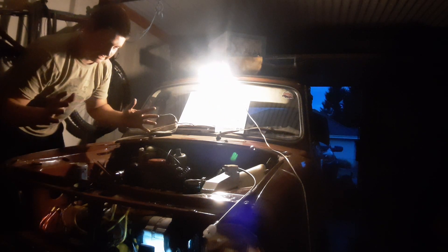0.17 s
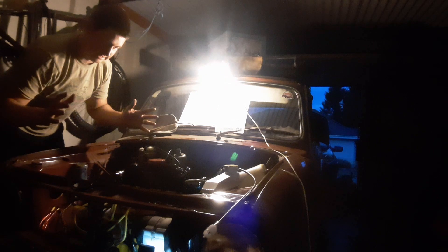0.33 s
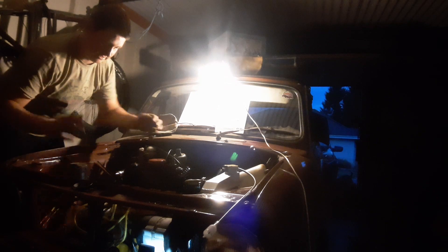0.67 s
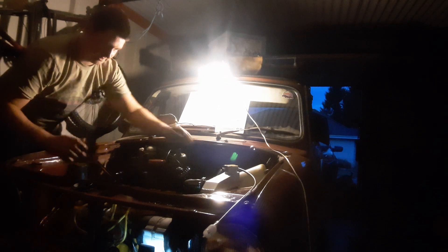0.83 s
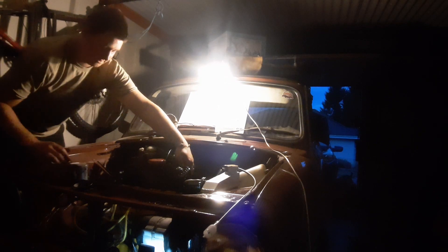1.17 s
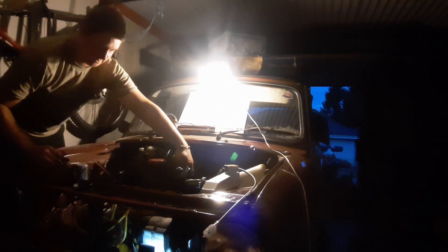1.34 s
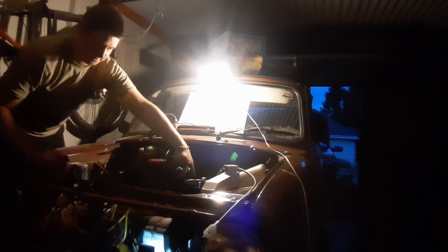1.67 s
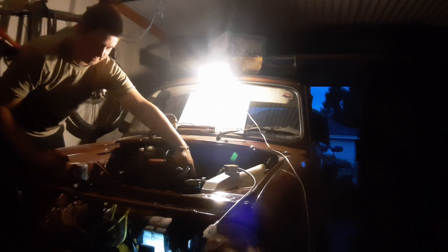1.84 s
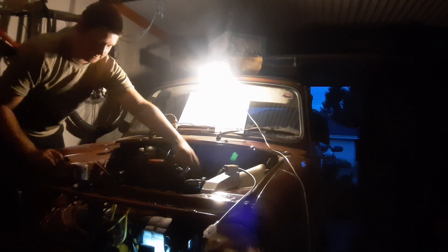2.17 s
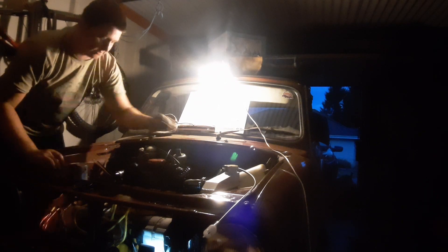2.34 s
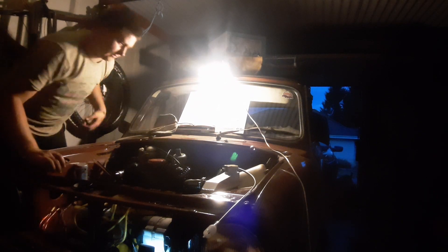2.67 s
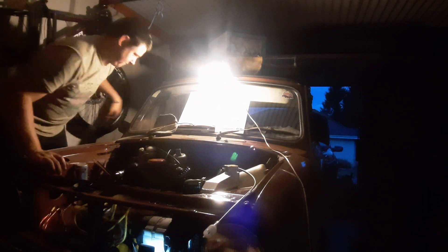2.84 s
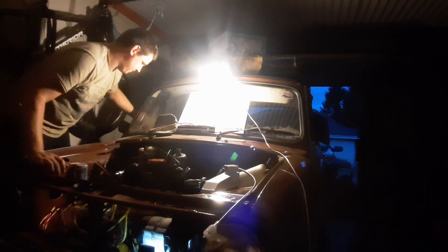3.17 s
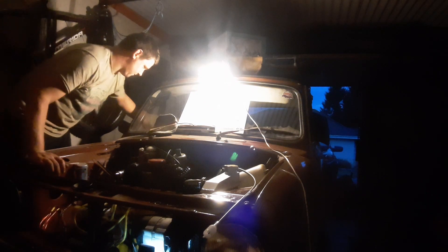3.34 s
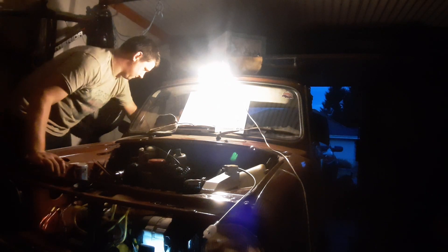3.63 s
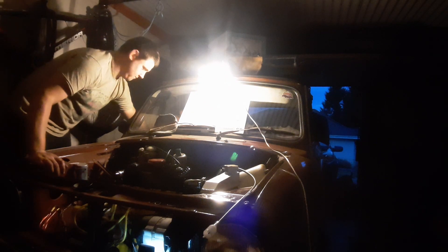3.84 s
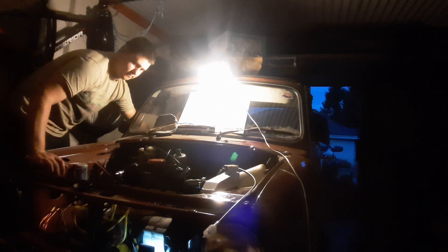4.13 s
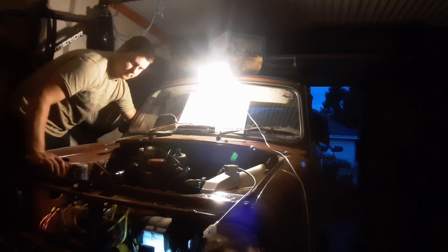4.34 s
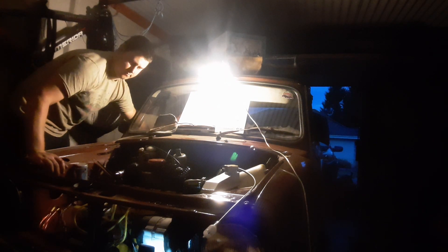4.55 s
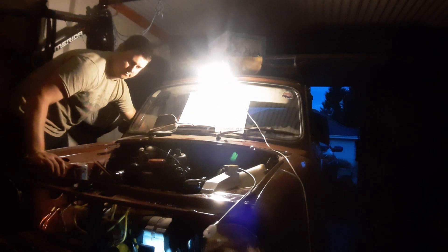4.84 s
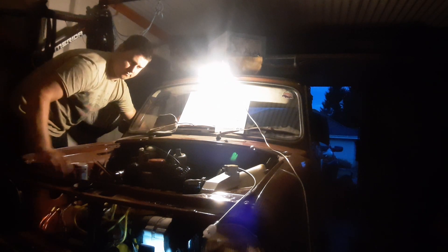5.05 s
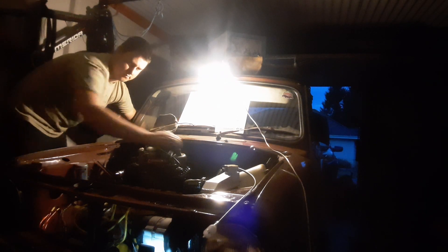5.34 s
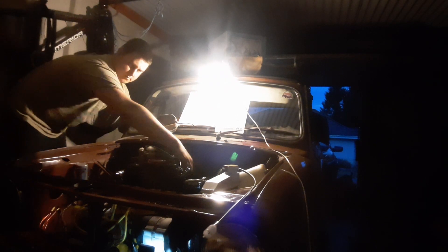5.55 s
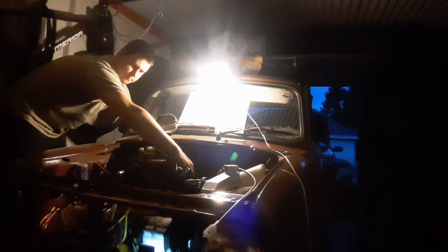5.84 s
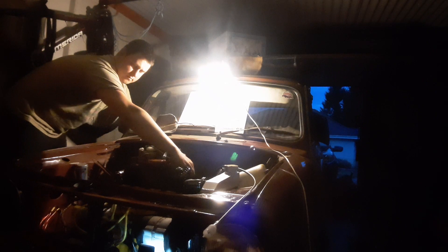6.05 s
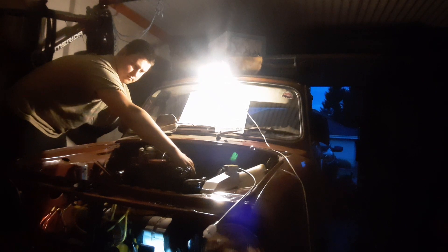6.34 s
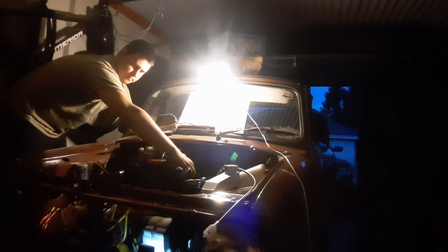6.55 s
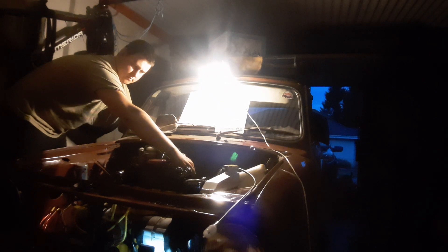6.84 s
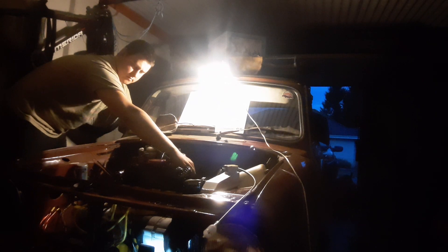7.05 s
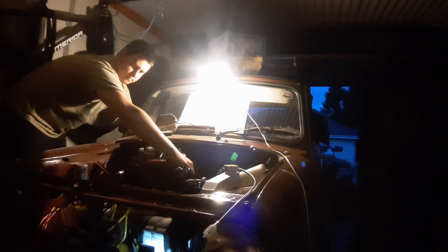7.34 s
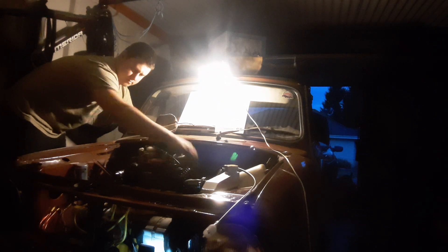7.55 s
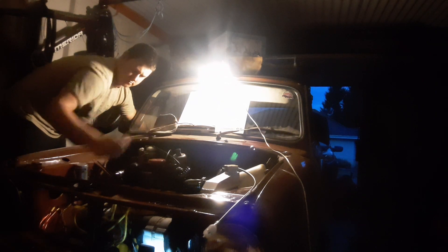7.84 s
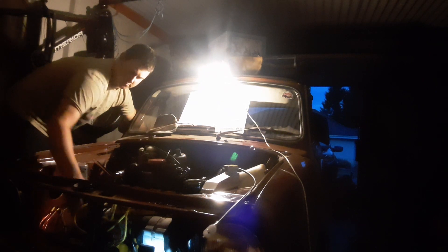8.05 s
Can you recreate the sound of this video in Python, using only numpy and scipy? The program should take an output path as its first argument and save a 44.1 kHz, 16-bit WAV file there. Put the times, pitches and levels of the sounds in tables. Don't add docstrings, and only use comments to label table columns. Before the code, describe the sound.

In a garage, a rough little engine stalls; quiet knocks and rubbing follow, then cranking, a roaring rev, a sharp carburettor cough and uneven idling.

```python
import sys
import numpy as np
from scipy import signal
from scipy.fft import rfft, irfft, next_fast_len
from scipy.io import wavfile
from scipy.ndimage import uniform_filter1d, map_coordinates

SR = 44100
rng = np.random.default_rng(int(sys.argv[2]) if len(sys.argv) > 2 else 0)


def waveform_to_disk(signal):
    frames = np.transpose(np.atleast_2d(signal))
    scaled = np.clip(frames, -1, 1) * 32767
    samples = np.round(scaled).astype(np.int16)
    wavfile.write(sys.argv[1], SR, samples)


def makeup_ratio(level_db):
    decades = np.asarray(level_db, float) / 20
    return 10 ** decades


N = 361619
T = np.arange(N) / SR
PADDED = next_fast_len(N)
HZ = np.fft.rfftfreq(PADDED, 1 / SR) + 1

# (frequency [Hz], density [dB per Hz])
ENGINE_TONE = [(110, -35), (180, -11), (328, 0), (645, -4), (722, -3.5), (1010, -6.5), (1150, -5),
               (1500, -2), (1810, -9), (2950, -1), (5000, -5), (6870, -2.5), (8290, -10.5), (12300, -10.5),
               (16000, -9.5)]
# (time [s], strokes done [count], drop of the air flow [dB])
CRANK_STROKES = [(-.14, -4, 6), (.135, 0, 8), (.417, 4, 2), (.671, 8, 7), (.943, 12, 9), (1.231, 16, 9),
                 (1.55, 20, 11), (1.811, 23, 9), (1.924, 24, 1), (2.3, 25, 1), (4.3, 26, 1), (4.659, 28, 1),
                 (4.897, 30, 1), (5.073, 33, 1), (5.282, 37, 1), (5.482, 41, 2), (5.688, 45, 1),
                 (5.904, 49, 4), (6.106, 53, 2), (6.299, 57, 3), (6.476, 61, 4), (6.684, 66, 3),
                 (6.856, 70, 2), (7.023, 74, 4), (7.249, 78, 3), (7.515, 82, 5), (7.773, 86, 3),
                 (8.003, 90, 2), (8.21, 94, 2)]
KEY_S, MESH_S, RELEASE_S = 4.382, 4.425, 5.16
SPIT_S, SPIT_AIR_DB, SPIT_BLOCK_DB, SPIT_TOP_DB = 7.104, -20.5, -26, -25


def unit(x):
    return x / np.sqrt(np.mean(x ** 2))


def gains(parts, column, fade=0.0031):
    out = np.zeros(N)
    for rows in parts:
        s, db = np.array(rows)[:, [0, column]].T
        edge = np.clip(np.minimum(T - s[0], s[-1] - T) / fade + 1, 0, 1)
        out += edge * makeup_ratio(np.interp(T, s, db))
    return out


def swell(s, attack_s, hold_s, db, sag_db_s, fall_db_s):
    t = T - s - attack_s
    rise = np.clip(1 + t / attack_s, 0, 1) ** 2
    return rise * makeup_ratio(db - sag_db_s * np.clip(t, 0, hold_s) - fall_db_s * np.maximum(t - hold_s, 0))


def on_log(rows):
    return np.interp(np.log(HZ), np.log(np.array(rows)[:, 0]), np.array(rows)[:, 1])


def ring(x, hz, width):
    return signal.lfilter(*signal.iirpeak(hz, hz / width, fs=SR), x)


def walk(rate):
    k = int(SR / rate)
    steps = np.repeat(rng.standard_normal(N // k + 1), k)[:N]
    return unit(uniform_filter1d(steps, k))


def rush(tone, lo_hz, hi_hz, lag, peaks=(), lift_db=6, grain_db=0):
    # (frequency [Hz], coherence [0-1])
    likeness = [(60, .99), (130, .97), (290, .92), (640, .8), (1400, .58), (3100, .55), (7000, .45),
                (16000, .4)]
    shared, left, right = rfft(rng.standard_normal((3, N)) * makeup_ratio(grain_db * walk(900)), PADDED)
    shape = makeup_ratio(on_log(tone)) / np.sqrt((1 + (lo_hz / HZ) ** 16) * (1 + (HZ / hi_hz) ** 16))
    bumps = sum(1 / (1 + (2 * (HZ - f) / w) ** 2) * makeup_ratio(db / 3) for f, w, db in peaks)
    alike = np.clip(on_log(likeness), 0, 1)
    late = np.exp(2j * np.pi * HZ * lag / SR)
    pair = np.sqrt(alike) * shared * np.array([late, late ** 0])
    pair = pair + np.sqrt(1 - alike) * np.array([left, right])
    return unit(irfft(pair * shape * (1 + makeup_ratio(lift_db) * bumps), PADDED)[:, :N])


def engine():
    # (time [s], air flow [dB], firing strength [dB])
    throttle = [
        [(0.0, -47.5, -42.5), (0.2, -50.5, -47.5), (0.56, -36.5, -36), (1.0, -36, -34), (1.5, -38, -38),
         (1.85, -39, -34), (1.97, -62.5, -60.5), (2.15, -80, -73)],
        [(4.81, -36.5, -37), (5.2, -32, -30), (5.96, -34.5, -35), (6.25, -29.5, -28), (6.65, -28.5, -30.5),
         (7.05, -27.5, -29), (7.1, -33, -35), (7.36, -45.5, -48.5), (7.5, -45.5, -41), (8.2, -44, -44.5)],
    ]
    spit_hold_s = 0.057
    strokes, pause_db, weak_db, sag_db = crank()
    flow = gains(throttle, 1)
    spit = swell(SPIT_S, 0.0017, spit_hold_s, 0, 17, 497)
    spit += swell(SPIT_S, spit_hold_s, spit_hold_s / 2, -13.5, 0, 77)
    rattle = makeup_ratio(-5.5) * flow ** 0.92 + makeup_ratio(SPIT_BLOCK_DB) * spit
    chuff = makeup_ratio(1.66 * np.exp(-((strokes - .25) % 1) / .5) + 1.9 * walk(16) - 1.0)

    fire = gains(throttle, 2, fade=0.028) * makeup_ratio(-sag_db)
    fire += swell(7.125, 0.02, 0.008, -29.5, 0, 270)
    fire += swell(MESH_S, 0.021, 0.34, -47.5, 0, 300)
    sound = exhaust() * fire
    sound = sound + block(rattle) * chuff * makeup_ratio(-.3 * pause_db - .05 * weak_db)
    sound += throat_whistle(strokes, rattle)
    sound += intake(flow, spit, chuff, pause_db, weak_db)
    bleed = rush([(3500, -16), (5400, -4), (7200, -5)], 3200, 6400, 7.5)
    return sound + bleed * swell(2.23, 0.056, .52, -66.0, 21.2, 230)


def crank():
    # (time [s], length [s], sag [dB])
    misfires = [(0.174, 0.067, 7), (0.356, 0.03, 1), (.61, 0.037, -3.5), (0.746, .05, 5), (0.875, .03, -4),
                (1, 0.047, 5.5), (1.274, .045, 14), (1.588, 0.066, 11), (1.85, 0.075, 12), (4.62, 0.062, 6),
                (5.023, 0.036, -6.5), (5.17, 0.12, 6.5), (5.445, 0.025, 5), (5.534, 0.033, -2.5),
                (5.648, .03, 4), (5.95, 0.17, 2.5), (7.336, 0.036, 6), (7.56, 0.065, 6), (7.715, .04, -4),
                (7.805, 0.026, 4), (7.983, .04, 4)]
    s, count, drop_db = np.transpose(CRANK_STROKES)
    strokes = uniform_filter1d(np.interp(T, s, count), size=4001)
    pause = (.5 + .5 * np.cos(2 * np.pi * strokes)) ** 3.7
    depth_db = np.clip(5 - 0.3 * (np.gradient(strokes) * SR - 14), 1.5, 8)
    nearest = np.abs(strokes - count[np.searchsorted((count[1:] + count[:-1]) / 2, strokes)])
    weak = np.cos(np.pi * np.minimum(nearest, .5)) ** 2
    sag_db = sum(db * np.exp(-((T - at) / length) ** 2) for at, length, db in misfires)
    return strokes, depth_db * pause, np.interp(T, s, drop_db) * weak, sag_db


def exhaust():
    # (frequency [Hz], width [Hz], level [dB])
    modes = [(48.8, 3.5, 4), (81.1, 3.1, 8), (119.1, 5.8, -4), (150, 3.65, -4.5), (169.3, 7.5, -11.5),
             (236, 9.5, -18.5), (30, 12, -31)]
    # (time [s], puffs done [count])
    valve = [(-.1, -2), (.047, 0), (.196, 2), (.335, 4), (.471, 6), (.59, 8), (.728, 10), (.854, 12),
             (.999, 14), (1.136, 16), (1.293, 18), (1.445, 20), (1.618, 22), (1.779, 24), (1.893, 25),
             (2.3, 26), (4.3, 27), (4.65, 30), (4.807, 32), (4.938, 34), (5.055, 36), (5.254, 40),
             (5.507, 45), (5.661, 48), (5.87, 52), (6.081, 56), (6.324, 61), (6.508, 65), (6.677, 69),
             (6.837, 73), (6.971, 76), (7.061, 78), (7.187, 80), (7.364, 82), (7.427, 83), (7.557, 85),
             (7.693, 87), (7.821, 89), (7.934, 91), (8.044, 93), (8.25, 97)]
    cylinder_db = [-3, -5.5, -5, -5.5]
    done = np.interp(T, *np.transpose(valve))
    turn = np.floor(done).astype(int)
    at = np.flatnonzero(np.diff(turn)) + 1
    slow = np.clip((21 - SR / np.gradient(at)) / 7, .5, 1)
    chance = rng.standard_normal((200, 2))[:len(at)] * slow[:, None]
    late = (chance[:, 0] * .001 * SR).astype(int)
    puffs = np.zeros(N)
    puff_db = np.take(cylinder_db, turn[at] % 4) * slow + 1.2 * chance[:, 1]
    puffs[np.clip(at + late, 0, N - 1)] = makeup_ratio(puff_db)
    puffs[0] = makeup_ratio(cylinder_db[0])

    rate = uniform_filter1d(np.gradient(done) * SR, size=4001)
    gas = rng.standard_normal((2, N)) + 3 * rng.standard_normal(N)
    puffs = puffs + makeup_ratio(-49.5 + 0.8 * (rate - 16)) * ring(gas, 135., 90.)
    tilt_db = 1.35 * np.clip(rate - 20, 0, 5)
    pipe = 0
    for k, (f, w, db) in enumerate(modes):
        pipe = pipe + (-1) ** k * makeup_ratio(db + tilt_db * np.log2(f / 80)) * ring(puffs, f, w)
    pipe = signal.sosfilt(signal.butter(2, [34, 280], "band", fs=SR, output="sos"), pipe)
    return pipe / np.sqrt(uniform_filter1d(pipe[0] ** 2, int(.14 * SR)) + 1e-14)


def block(rattle):
    # (frequency [Hz], width [Hz], level [dB])
    peaks = [(736, 12, -11), (1214, 170, -12), (1546, 11, 1)]
    return rush(ENGINE_TONE, 178, 2110, 6.6, peaks, lift_db=-3.0, grain_db=0.5) * rattle


def intake(flow, spit, chuff, pause_db, weak_db):
    # (frequency [Hz], width [Hz], level [dB])
    peaks = [(2955, 33, -28.5), (3446, 10, -10), (4590, 56, -6), (5520, 64, -9), (6580, 44, 1),
             (7100, 60, -2), (7290, 19, -3), (7530, 140, 12)]
    blown = flow + makeup_ratio(SPIT_AIR_DB) * spit
    roar = rush(ENGINE_TONE, 2295, 7700, 2.5, peaks, lift_db=5.5, grain_db=1.5)
    roar += cavities() * flow / (blown + 1e-9)
    slip = np.arange(N) + .07 * np.cumsum(np.log(chuff) - np.log(chuff).mean())
    roar = np.array([map_coordinates(port, [slip], mode="mirror") for port in roar]) * blown
    hiss = rush(ENGINE_TONE, 7430, 15300, 3.34, grain_db=1.0)
    hiss *= makeup_ratio(-32) * flow / np.hypot(flow, makeup_ratio(-30)) + makeup_ratio(SPIT_TOP_DB) * spit ** 1.3
    air = roar * makeup_ratio(3.0 - 0.62 * pause_db - 0.82 * weak_db + 1.0 * walk(35)) * chuff ** 0.065
    return air + hiss * makeup_ratio(2.0 - 1.14 * pause_db - 1.4 * weak_db)


def cavities():
    # (frequency [Hz], width [Hz], level [dB])
    hollows = [(723.7, 46, -14.5), (1159, 100, -10), (1482.6, 45, -15.5), (3010, 90, -8.5),
               (3480, 60, -9.5), (4050, 90, -14), (4676, 72, -13), (5455, 90, -10), (6715, 120, -9),
               (7140, 50, -9.5)]
    flare_db, flares_per_s = 4, 45
    shared = rng.standard_normal(N)
    air = rng.standard_normal((2, N)) + np.array([np.roll(shared, -3), shared])
    out = np.zeros((2, N))
    for hz, width, db in hollows:
        flare = flare_db * (np.tanh(walk(flares_per_s)) - .5)
        out += unit(ring(ring(air, hz, width), hz, width)) * makeup_ratio(db + flare)
    return out


def throat_whistle(strokes, rattle):
    # (frequency [Hz], density [dB per Hz])
    throats = [(950, -27.5), (1080, -11.5), (1160, 1.5), (1260, -18.5), (1500, -11.5), (2800, -25),
               (3000, 0.5), (3200, -16.5), (3430, 6.5), (3650, -19)]
    marks = np.transpose(CRANK_STROKES)[1]
    before_weak = marks[np.searchsorted(marks, strokes)] - strokes < 1
    luck = rng.standard_normal(200)[np.floor(strokes).astype(int) + 10]
    strength = makeup_ratio(1.5 * luck + 9 * before_weak)
    whistle = rush(throats, 900, 3800, 3) * strength * np.sin(np.pi * strokes) ** 4
    whistle *= rattle ** 1.1 * makeup_ratio(-18.5)
    return whistle * (np.gradient(strokes) * SR > 6)


def chirps():
    # (time [s], frequency [Hz], level [dB])
    gulps = [(7.326, 3010, -40), (7.34, 3420, -35), (7.464, 1200, -40), (7.472, 3380, -40),
             (7.72, 1150, -52), (7.209, 1250, -39), (7.265, 2980, -35), (7.399, 1616, -44),
             (7.612, 2610, -46), (7.63, 3500, -49), (7.745, 3450, -47), (8.185, 3970, -50),
             (7.795, 1150, -47.5), (7.803, 3430, -45), (7.866, 2940, -42), (7.866, 3390, -43),
             (7.966, 1166, -43), (7.975, 3580, -47), (8.088, 3380, -44.5), (8.09, 2990, -58),
             (8.165, 1170, -43.5)]
    length_s, width_hz = .017, 70
    out, t = np.zeros((2, N)), T[:SR // 4] - 1 / 8
    shape = np.exp(-(t / length_s) ** 2)
    for s, hz, db in gulps:
        air = rng.standard_normal((3, len(t)))
        note = shape * ring(ring(air[:2] + air[2], hz, width_hz), hz, width_hz)
        part = out[:, int((s - 1 / 8) * SR):][:, :len(t)]
        part += (makeup_ratio(db) * unit(note) / unit(shape).max())[:, :part.shape[1]]
    return out


def starter():
    # (frequency [Hz], density [dB per Hz])
    tone = [(88, -28), (150, -5.5), (190, -12), (361, -4.5), (566, -7), (790, 0), (2400, -7), (2700, -3.5),
            (6140, -1), (7320, -11), (8400, -21.5), (11500, -20.5), (16000, -24.5)]
    # (frequency [Hz], width [Hz], level [dB])
    growl_peaks = [(393, 100, -30), (785, 26, 19), (1150, 37, 15), (1370, 43, -1), (1627, 27, 17),
                   (1830, 45, 1)]
    grind_peaks = [(2764, 120, -3), (4270, 50, -1), (5260, 140, -1), (6260, 22, 18), (7200, 82, 11)]
    # (time [s], length [s], growl [dB], gear grind [dB])
    labours = [
        (4.406, 0.019, -17.5, -30),
        (4.527, 0.12, -27, -18.5),
        (4.711, 0.046, -31, -24),
        (4.853, 0.042, -36, -19),
        (4.933, 0.034, -47, -25),
        (5.035, 0.047, -29.5, -23),
    ]
    run_s = RELEASE_S - MESH_S
    strain = [sum(swell(row[0], 0.41 * row[1], 0.22 * row[1], row[k], 90, 236) for row in labours)
              for k in (2, 3)]
    spin = swell(KEY_S, .014, MESH_S - KEY_S, 0, 0, 900) ** 2
    teeth = makeup_ratio(1.3 * walk(70))
    growl = rush(tone, 130, 2300, 7.9, growl_peaks, lift_db=-2.0, grain_db=3)
    growl *= swell(MESH_S, 0.0058, run_s, -27.5, 5.7, 210) + strain[0] + makeup_ratio(-37.0) * spin
    grind = rush(tone, 1600, 8200, 12.1, grind_peaks, lift_db=4.5, grain_db=1.5)
    grind *= swell(MESH_S, 0.01, run_s, -23.5, 8.1, 160) + strain[1] + makeup_ratio(-25.5) * spin
    whirr = rush(tone, 7970, 15300, 12.4, grain_db=2.0)
    whirr *= swell(MESH_S, 0.0063, run_s, -40.5, -10.5, 110.0) + makeup_ratio(-15.5) * strain[1] + makeup_ratio(-32.5) * spin
    hum = rush([(680, -7.0), (790, -2), (920, -5)], 530, 960, 9.3)
    faint = swell(4.19, 0.21, .06, -66.5, 0, 500)
    hum *= swell(KEY_S, 0.016, run_s + 0.21, -39, -1.7, 500) + faint
    return teeth * (growl + grind) + whirr + hum + whines()


def whines():
    # (time [s], length [s], from [Hz], to [Hz], level [dB])
    glides = [(4.42, .07, 400, 290, -27), (4.41, .05, 680, 625, -21), (4.435, .13, 1130, 1160, -27),
              (4.56, .08, 1640, 1390, -22), (4.55, .06, 1160, 1020, -28), (4.61, .06, 470, 400, -23),
              (4.555, .07, 610, 530, -29), (4.615, .04, 920, 880, -26), (4.47, .09, 350, 400, -31),
              (4.725, .065, 700, 820, -27), (4.82, .08, 760, 840, -28), (4.92, .08, 830, 770, -26),
              (5.035, .07, 720, 860, -27), (5.15, .045, 780, 950, -28), (5.215, .075, 740, 715, -30),
              (4.66, .05, 700, 860, -30), (4.72, .045, 340, 215, -30), (4.855, .06, 1180, 1100, -24),
              (4.87, .04, 1900, 1980, -29), (4.925, .06, 1950, 2100, -27), (5.055, .035, 2750, 2570, -24),
              (5.07, .11, 700, 623, -27), (7.073, .03, 220, 250, -12), (7.082, .022, 400, 480, -19)]
    out, wobble, flutter = np.zeros(N), walk(120), walk(110)
    for k, (s, length, from_hz, to_hz, db) in enumerate(glides):
        x = np.linspace(0, 1, int(length * SR))
        own = slice(k * SR // 4, k * SR // 4 + len(x))
        hz = (from_hz + (to_hz - from_hz) * x) * (1 + 0.035 * wobble[own])
        gain = makeup_ratio(db - 3.5 + 4.2 * np.tanh(flutter[own])) * np.sin(np.pi * x)
        out[int(s * SR):][:len(x)] += gain * np.sin(2 * np.pi * np.cumsum(hz) / SR)
    return np.array([np.roll(out, -12), out])


def knocks():
    # (time [s], peak [dB], pitch [Hz], T60
    # [s], crack re ring [dB])
    blows = [(2.012, -52.5, 800, 0.24, 9), (2.028, -56, 336, .15, -5), (2.184, -53, 2700, 0.2, 5.5),
             (2.21, -30.5, 426, 0.14, -2.5), (2.221, -26, 413, 0.073, -8), (2.247, -35.5, 455, 0.12, -3),
             (3.153, -61, 143, 0.14, -9), (3.294, -46.5, 163.3, 0.38, -11), (3.653, -56, 137, 0.34, -10),
             (3.887, -53, 123, 0.17, 2), (4.415, -16.5, 332, 0.11, 8.5), (7.535, -28.5, 409.4, 0.17, -3),
             (7.556, -32, 442, 0.19, -5)]
    # (frequency ratio [1], level [dB], share of T60 [1])
    partials = [(1, 0, 1), (.9, -7, .8), (1.12, -6, .8), (1.5, -15, .8), (1.76, -7, .8), (2.3, -10, .9),
                (3.4, -16, .6), (.36, -22, 1)]
    # (time [s], frequency [Hz], level [dB], T60 [s])
    singing = [
        (1.9, 1470, -59, 0.71),
        (1.7, 1460, -56, 0.5),
        (2.186, 1460, -59, .2),
        (1.93, 2330, -61, .3),
    ]
    room_t60_s, room_db = .3, -7
    out, t = np.zeros(N + SR), T[:SR // 2]
    push = np.minimum(t * 1000 / 8.2, 1)
    for s, db, hz, t60, crack_db in blows:
        detune = 1 + rng.standard_normal(len(partials)) / 50
        rough, crack = rng.standard_normal((2, len(t)))
        note = np.zeros(len(t))
        for (r, g, share), d in zip(partials, detune):
            note += makeup_ratio(g - 60 * t / (t60 * share)) * np.sin(2 * np.pi * r * (hz * d * t + r))
        note *= push * makeup_ratio(2.5 * unit(uniform_filter1d(rough, size=400)))
        crack = unit(ring(ring(crack, 550.0, 1600.0), 1270.0, 5600.0))
        crack *= makeup_ratio(crack_db - 60 * t / t60) * push
        out[int(s * SR):int(s * SR) + len(t)] += makeup_ratio(db) * (note / np.abs(note).max() + crack / 2)
    for s, hz, db, t60 in singing:
        note = makeup_ratio(db - 60 * t / t60) * push * np.sin(2 * np.pi * hz * t)
        out[int(s * SR):int(s * SR) + len(t)] += note
    echo = rush([(50, -3.5), (9000, -10.5)], 40, 13600, 0)[:, :len(t)]
    echo = echo * makeup_ratio(-60 * t / room_t60_s) * (t > .004)
    echo /= np.sqrt(np.sum(echo ** 2) / 2)
    return out[:N] + makeup_ratio(room_db) * signal.fftconvolve(out[None, :N], echo, axes=1)[:, :N]


def hand():
    # (frequency [Hz], density [dB per Hz])
    tone = [(41, -56), (70, -28), (138, 4), (218, -13), (336, -4.5), (376, -7), (744, -2), (1760, -17.5),
            (1890, -16), (6900, -13), (16000, -28)]
    # (time [s], length [s], pressure [dB], cloth [dB], thin hiss re cloth [dB])
    rubs = [
        (3.147, 0.02, -57, -90, -5),
        (3.283, 0.14, -56, -61.5, -16),
        (3.455, 0.16, -99, -65, -11),
        (3.554, 0.3, -83, -48.5, -10),
        (3.636, 0.26, -56.5, -68, -10),
        (3.926, 0.28, -81, -87, -2),
        (4.06, 0.027, -87, -78, -5),
        (4.108, 0.066, -87, -74, -6),
    ]
    s, length, press_db, cloth_db, thin_db = np.transpose(rubs)[..., None]
    attack = 0.47
    stroke = swell(s, 0.0084, length, 0, 8, 262)
    slide = swell(s, attack * length, (1 - attack) * length, 0, 8.1, 200)
    booming = swell(s, .015, length, -2, 35, 70)
    drum = rush([(90, -7), (145, 9), (260, -11.5)], 85, 440, 17)
    drum *= (booming * makeup_ratio(press_db)).sum(axis=0)
    scrape = rush(tone, 270, 1520, 11.4, [(963, 13, 17), (357, 55, -19)], grain_db=0)
    scrape *= (stroke * makeup_ratio(press_db)).sum(axis=0)
    cloth = rush(tone, 1160, 7400, 12.4, grain_db=1.0) * (slide * makeup_ratio(cloth_db)).sum(axis=0)
    thin = rush(tone, 10500, 17000, 12.3, grain_db=1.5)
    cloth += thin * (slide * makeup_ratio(cloth_db + thin_db)).sum(axis=0)
    squeak = rush([(900, 0), (1000, 0)], 850, 860, 8)
    drum += squeak * swell(3.29, 0.024, 0.061, -57, 25, 400)
    return drum + makeup_ratio(2.5 * walk(40)) * scrape + makeup_ratio(walk(40)) * cloth


def garage_quiet():
    # (frequency [Hz], density [dB per Hz])
    tone = [(15, -34.5), (25, -2), (87, -3), (256, -18.5), (911, -17.5), (2110, -26), (2410, -26.5),
            (2610, -25.5), (13200, -28), (16000, -29)]
    return rush(tone, 22.5, 19000, 0) * makeup_ratio(-73)


def scene():
    return engine() + chirps() + starter() + knocks() + hand() + garage_quiet()


def roll_off(x):
    return signal.sosfilt(signal.butter(12, 17020, fs=SR, output="sos"), x)


def record(dry):
    rounded = 1.1 * np.tanh(dry / 1.1)
    low_pass = signal.ellip(10, .2, 70, 15880, fs=SR, output="sos")
    return roll_off(signal.sosfilt(low_pass, rounded))


dry = scene()
out = record(dry)
waveform_to_disk(out)
```